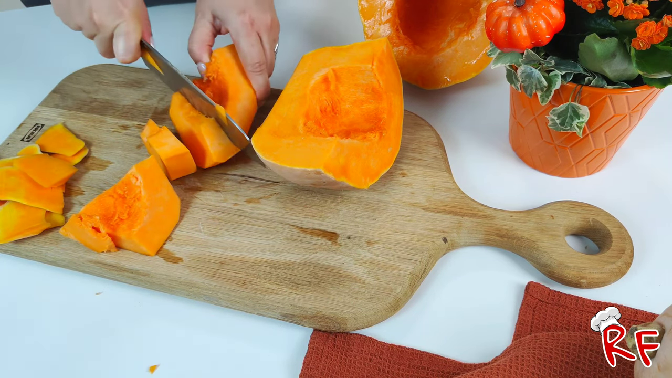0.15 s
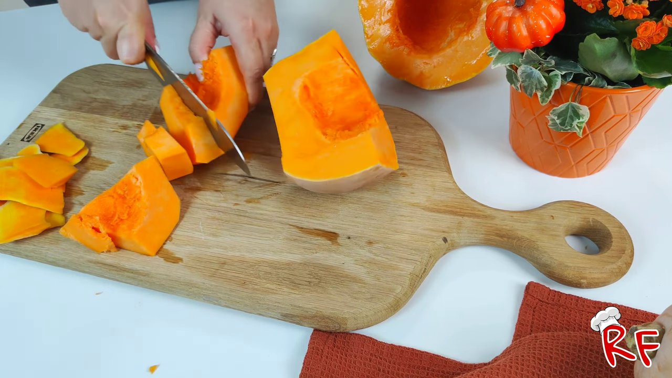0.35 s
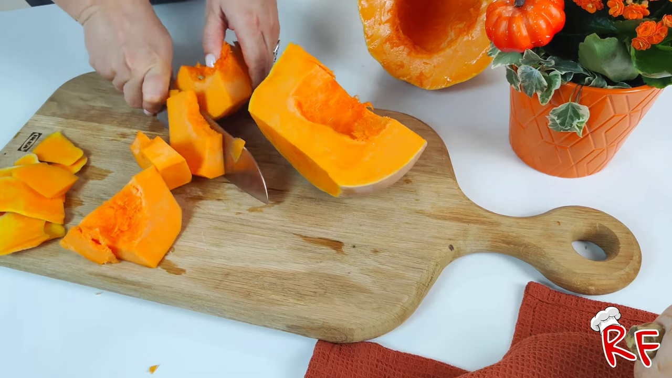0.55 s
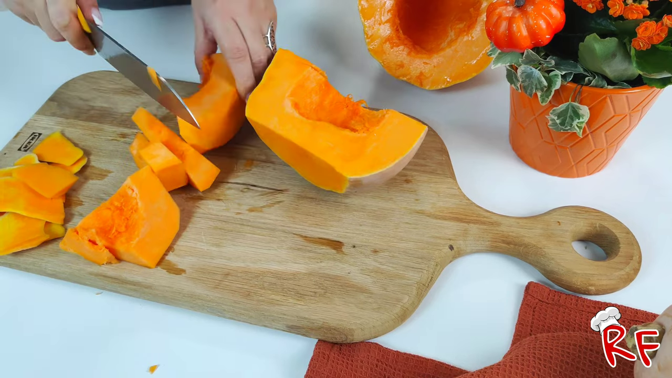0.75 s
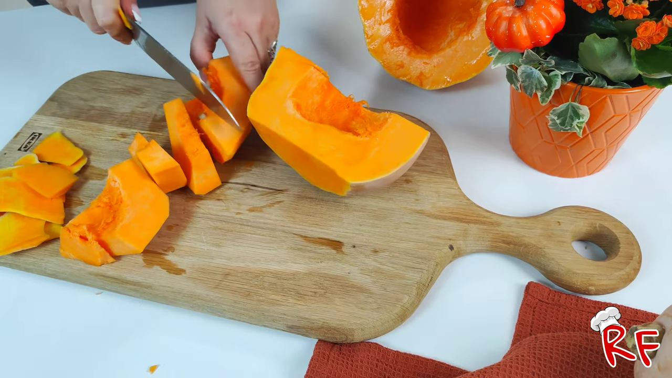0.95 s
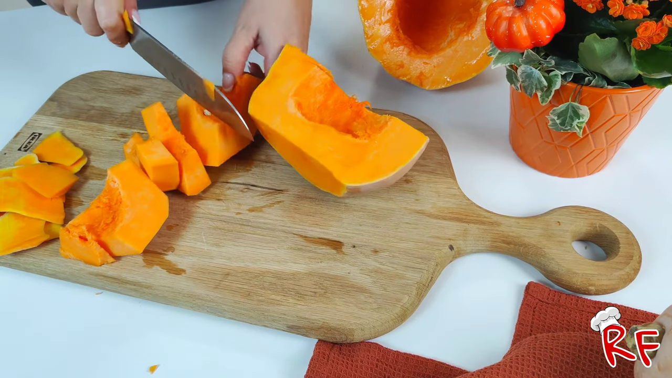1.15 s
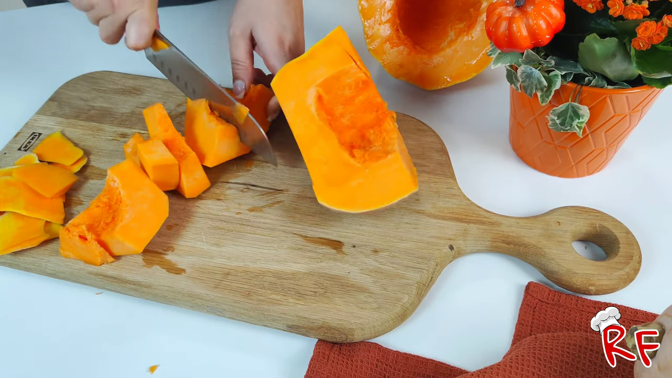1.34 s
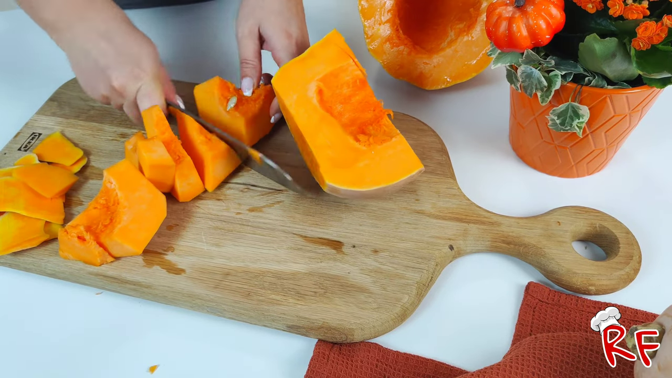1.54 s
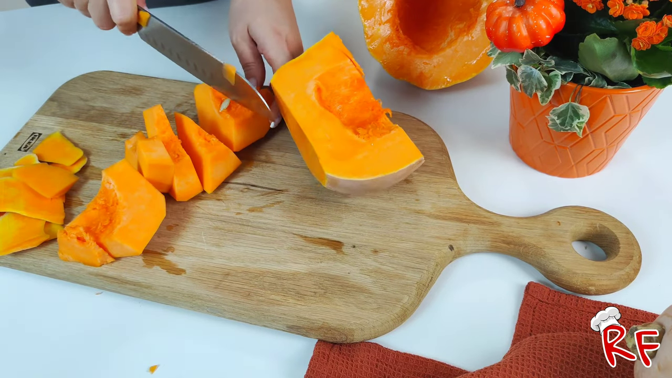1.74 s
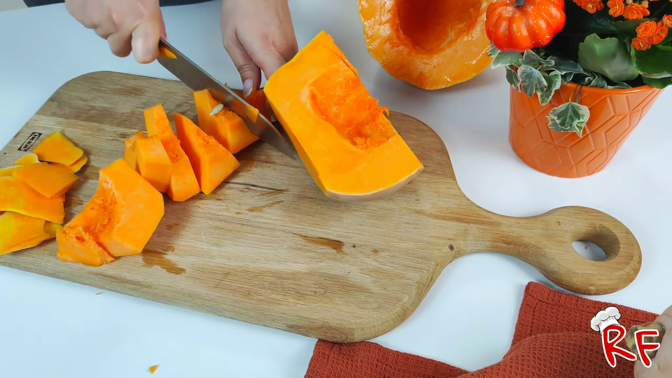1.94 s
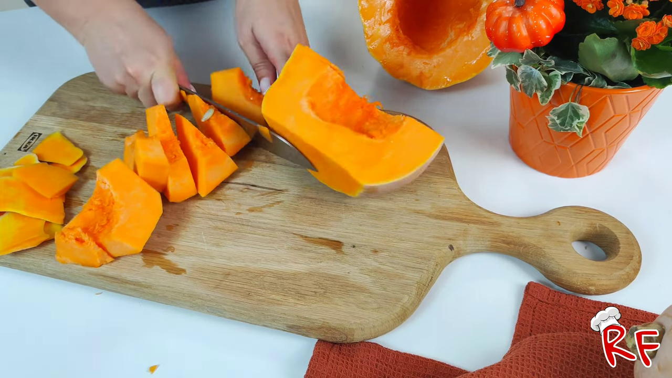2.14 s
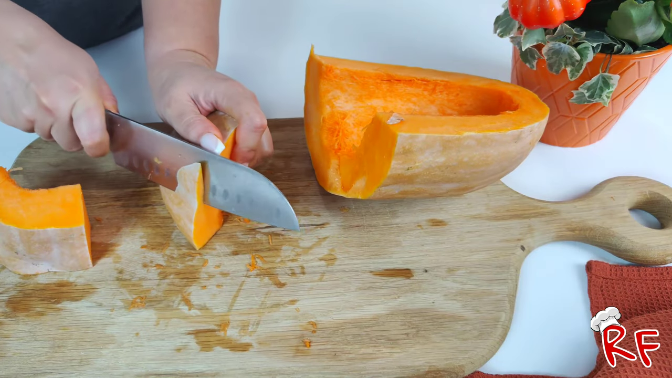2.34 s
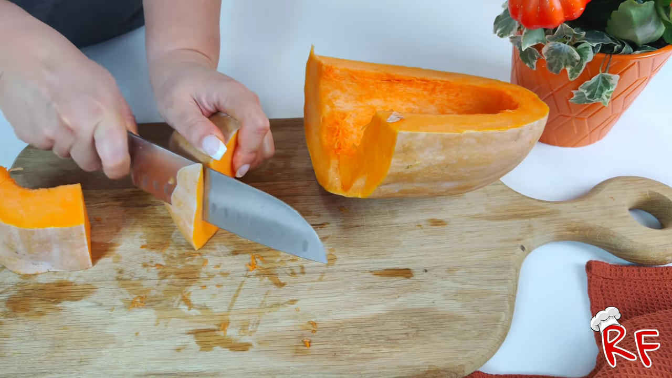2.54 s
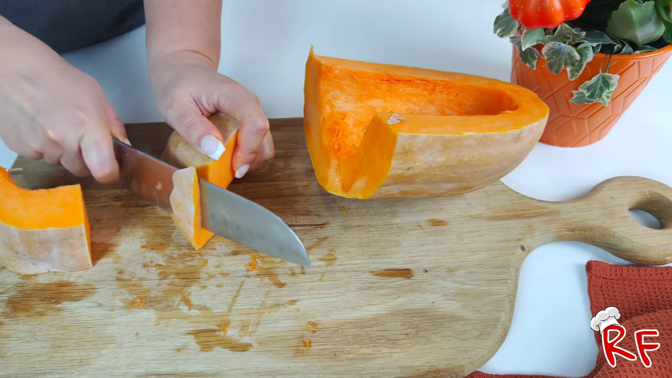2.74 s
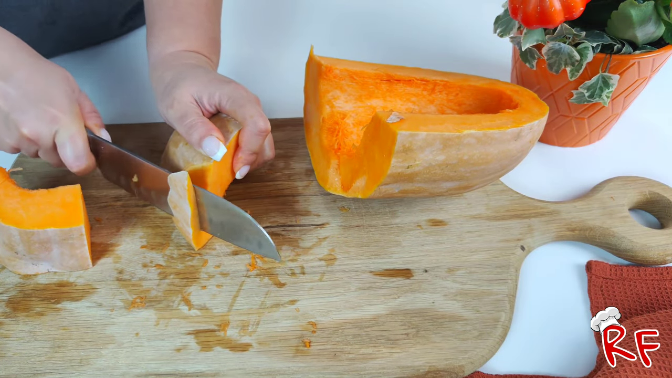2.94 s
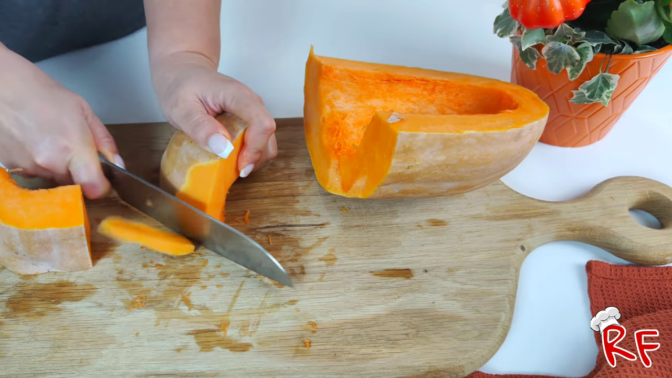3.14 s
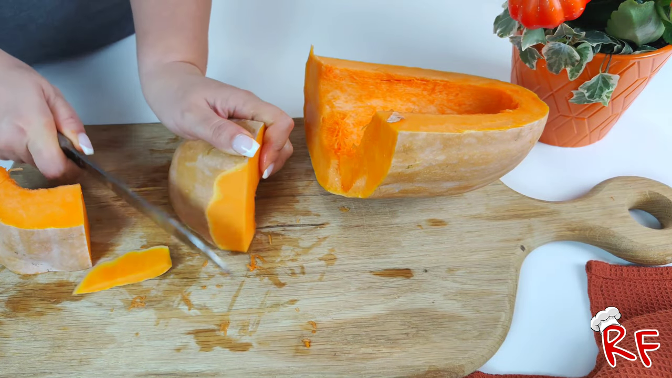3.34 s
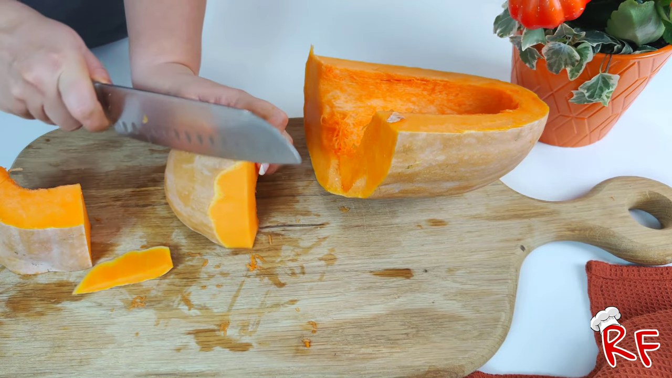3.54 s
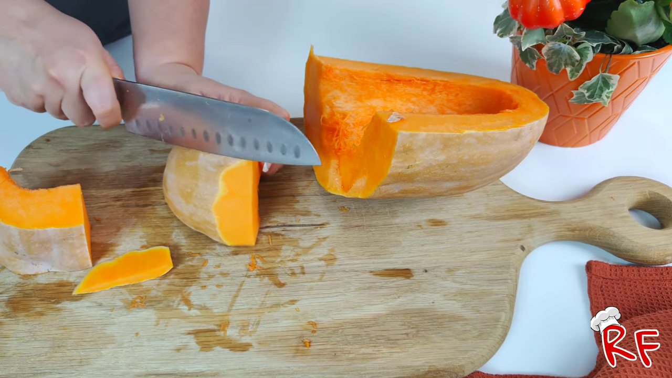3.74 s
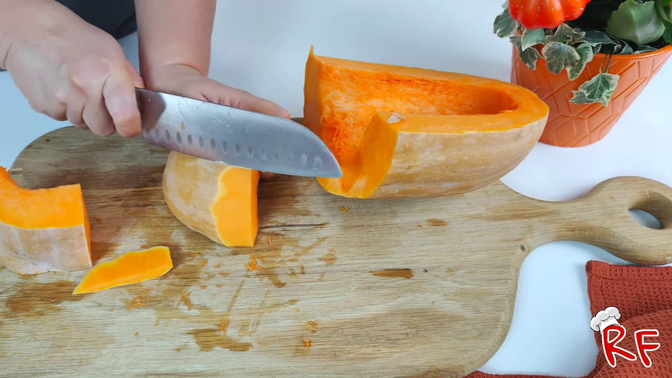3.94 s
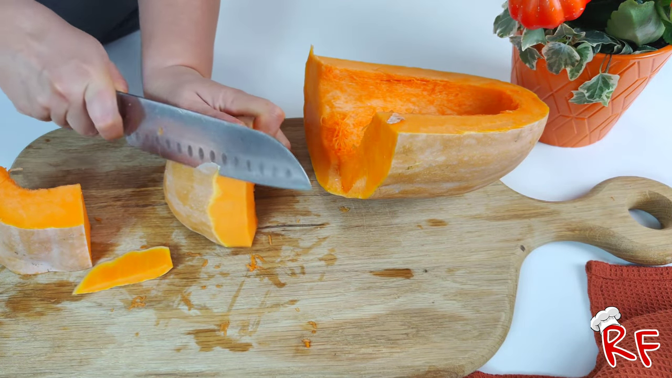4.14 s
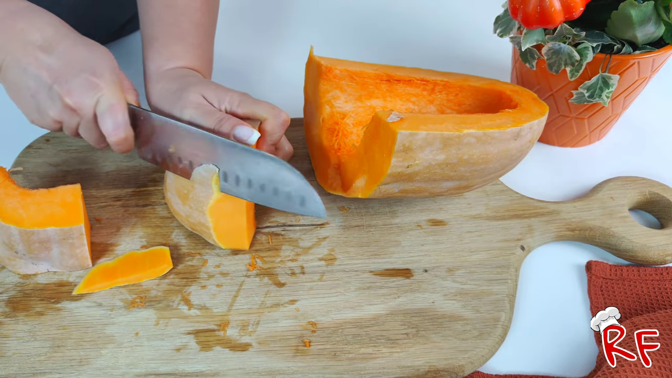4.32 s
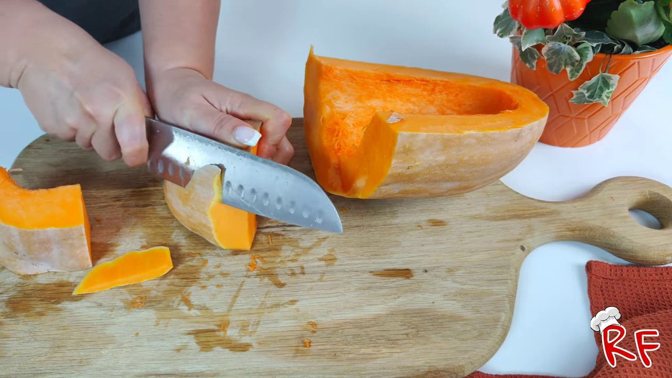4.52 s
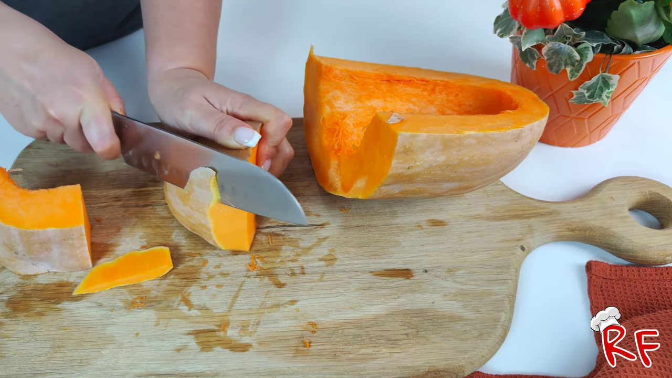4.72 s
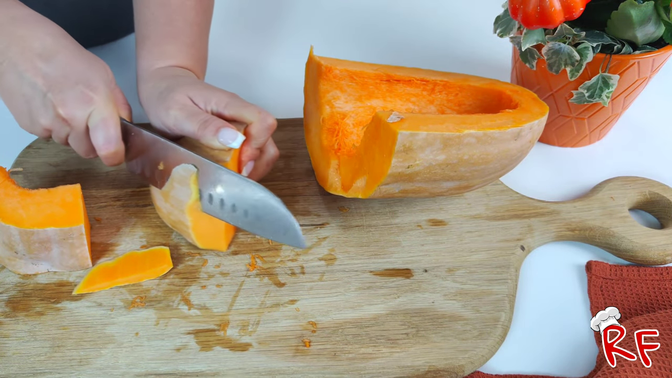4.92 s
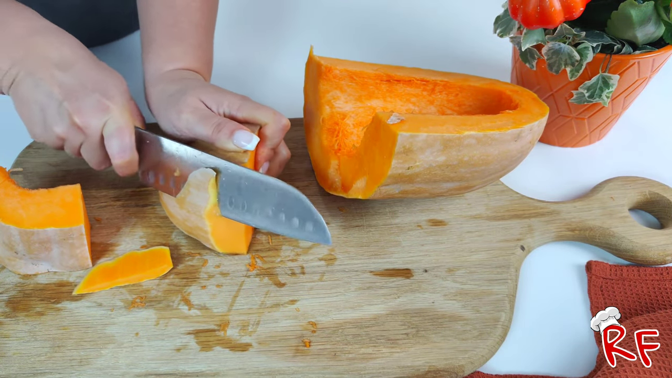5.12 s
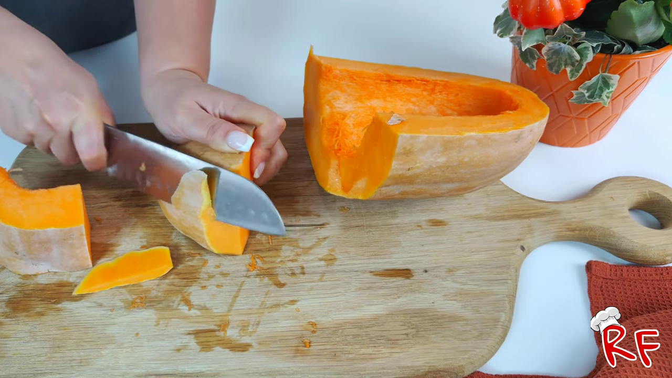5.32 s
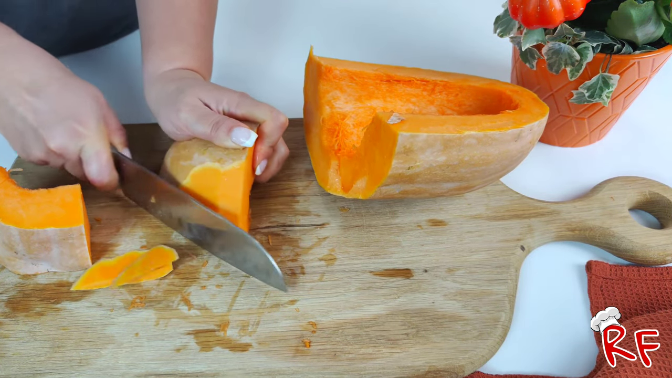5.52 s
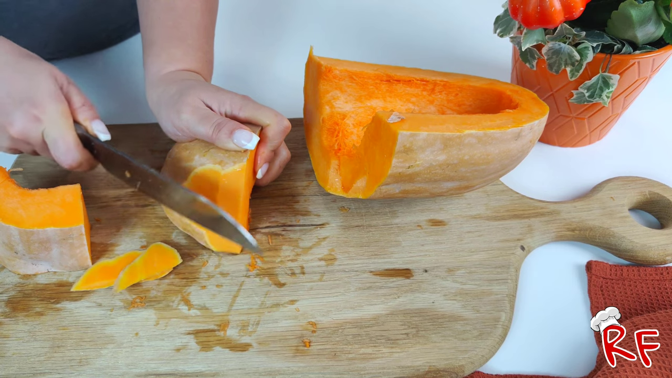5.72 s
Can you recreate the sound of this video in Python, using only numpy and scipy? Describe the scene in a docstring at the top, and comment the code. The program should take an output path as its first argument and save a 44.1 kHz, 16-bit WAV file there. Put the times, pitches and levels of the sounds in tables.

```python
"""A raw pumpkin is cut on a wooden board in a ringing kitchen, first with a slim knife, then with a broad one.
The blade hisses, rubs and fizzes through the flesh in short strokes: dense random clicks, coloured and swelled.
Chops, rind snaps, flesh cracks, bumping pieces and a toppling slice are crunchy pushes that ring resonances
and then the room. Squeaks are gliding narrow bands of noise; shaped noise makes the rumble of the working
hands and the quiet of the room."""
import sys
import numpy as np
from scipy import signal
from scipy.fft import rfft, irfft, next_fast_len
from scipy.io import wavfile

SR = 44100
rng = np.random.default_rng(int(sys.argv[2]) if len(sys.argv) > 2 else 0)


def unload_audio(sound):
    """Save the sound as a 16-bit wav file, at the path given as the first command line argument."""
    columns = np.transpose(np.atleast_2d(sound))
    # keep every value between -1 and 1, then stretch to whole-number steps
    steps = np.round(np.clip(columns, -1, 1) * 32767)
    wavfile.write(sys.argv[1], SR, steps.astype(np.int16))


N = 254438

# How a broad-knife movement begins and ends: attack [s], release [s], lingering level [dB], its 60 dB fade time [s]
BROAD_MOTION = (0.07, 0.0249, -8.5, 0.59)
LEFT_RIGHT_HALVES = np.array([[.5], [-.5]])  # shares a left-right difference in dB between the channels


def gain_of(db):
    """Decibels to amplitude."""
    return 10 ** (np.asarray(db) / 20)


def unit(x):
    """Scales a sound to an energy of one per channel, averaged over the channels."""
    return x / np.sqrt(np.sum(x ** 2) / len(x) + 1e-20)


def read(points, hz):
    """Reads a spectrum on a log-frequency axis."""
    f, value = np.transpose(points)
    return np.interp(np.log(hz + 1), np.log(f + 1), value)


def add(mix, s, sound):
    """Mixes a sound in at time s, cutting it off at the end of the mix."""
    part = mix[:, round(s * SR):][:, :sound.shape[1]]
    part += sound[:, :part.shape[1]]


def diffuse(x):
    """Makes two unrelated noises alike in the bass, as a room does at two close microphones."""
    # Likeness of left and right: f/Hz, correlation [0 to 1]
    likeness = [(100, .93), (350, .87), (600, .55), (1100, .25), (2200, .05), (15000, 0)]
    a, b = rfft(x)
    hz = np.fft.rfftfreq(x.shape[1], 1 / SR)
    turn = np.arccos(np.clip(read(likeness, hz), -1, 1)) / 2
    left = a * np.cos(turn) + b * np.sin(turn)
    right = a * np.cos(turn) - b * np.sin(turn)
    return irfft([left, right], x.shape[1])


def coloured(x, spectrum, side=((1000, 0),)):
    """Gives a stereo noise a spectrum and a left-right balance, at rms one."""
    hz = np.fft.rfftfreq(N, 1 / SR)
    db = read(spectrum, hz) + LEFT_RIGHT_HALVES * read(side, hz)
    return unit(irfft(rfft(diffuse(x)) * gain_of(db), N)) * np.sqrt(N)


def strokes(rows, motion):
    """Gain of hand movements (s, length s, dB, swell dB): each gathers speed, swells, stops and lingers."""
    attack_s, release_s, linger_db, linger_s = motion
    out = np.zeros((1, N))
    for s, length, db, swell_db in rows:
        t = np.arange(0, length + linger_s, 1 / SR)
        after = np.maximum(t - length, 0)
        attack = np.sin(np.pi / 2 * np.minimum(t / attack_s, 1)) ** 2
        hold = gain_of(db + swell_db * (np.minimum(t / length, 1) - .5))
        linger = gain_of(linger_db - 60 * after / linger_s)
        release = np.maximum(np.exp(-after / release_s), linger)
        add(out, s, (attack * hold * release)[None])
    return out


def uneven(depth_db, per_s):
    """A gain that wanders at random, with per_s new targets a second."""
    steps = rng.standard_normal(4096)
    return gain_of(depth_db * np.interp(np.arange(N) / SR * per_s, np.arange(len(steps)), steps))


def catching():
    """The blade catches in the fibres, so its speed, and with it the level, is uneven."""
    return uneven(depth_db=0.5, per_s=74)


def tearing(per_s, spread_db, wash):
    """Cell walls burst under the edge: random clicks of uneven size over their own wash in the room."""
    sizes = gain_of(spread_db * np.minimum(rng.exponential(1, N), 4)) * rng.standard_normal((2, N))
    clicks = sizes * (rng.random(N) < per_s / SR)
    return unit(clicks) + wash * unit(rng.standard_normal((2, N)))


def nearby(x, echo_db, count=8):
    """Board, hands and pumpkin throw back early echoes that comb the treble, differently at each microphone."""
    taps = np.zeros((2, SR // 200))
    delays = rng.integers(SR // 2000, SR // 200, (2, count))  # 0.5 to 5 ms
    np.put_along_axis(taps, delays, rng.choice([-1., 1.], (2, count)), 1)
    echoes = signal.sosfilt(signal.butter(2, 1500, "high", fs=SR, output="sos"), unit(taps))
    return x + gain_of(echo_db) * signal.oaconvolve(x, echoes, axes=1)[:, :N]


def ring(modes, treble_db, bass_db, pitch=1, size=8192):
    """Causal response of damped resonances; a harder contact lifts the treble, a heavier one the bass."""
    hz = abs(np.fft.fftfreq(size, 1 / SR))
    power = sum((gain_of(db) / (1 + ((hz - f * pitch) / (width / 2)) ** 2)) ** 2 for f, width, db in modes)
    treble_shelf = treble_db * hz ** 2 / (hz ** 2 + 2800 ** 2)
    bass_shelf = bass_db / (1 + (hz / 850) ** 6)
    radiated = (hz / np.hypot(hz, 0.5 * modes[0][0])) ** 2  # little is radiated below the lowest resonance
    log_gain = np.log(np.sqrt(power) * gain_of(treble_shelf + bass_shelf) * radiated + 1e-5)
    minimum_phase = np.exp(np.conj(signal.hilbert(log_gain)))
    return np.fft.ifft(minimum_phase).real[None, :size // 2]


def kitchen(fade_s, build_s, bend, wall_db):
    """A wall echo in a diffuse tail with standing waves: it builds up, then fades by band; bend > 1 speeds it up."""
    # Standing waves of the kitchen: f/Hz, level/dB
    standing = [(341, -20.5), (511, -27), (600, -20.5), (879, -26.5), (977, -35), (1025, -27),
                (1073, -26.5), (1104, -24.5), (1233, -30.5), (1593, -28), (1720, -31), (1943, -25.5),
                (2015, -28.5), (2547, -27.5)]
    # How each band fades: f/Hz, factor on the fade time
    band_fade = [(100, 0.24), (500, 0.83), (1200, 0.94), (2200, 0.99), (5000, 1.08), (9000, 0.97),
                 (15000, 1.3)]
    t = np.arange(next_fast_len(round(fade_s * SR))) / SR
    waves = np.zeros((2, len(t)))
    for f, db in standing:
        phase = 2 * np.pi * (f * t + rng.random()) + rng.normal(0, 0.68, (2, 1))
        waves += gain_of(db) * np.cos(phase)
    noise = diffuse(rng.standard_normal((2, len(t))))
    hz, age, z = signal.stft(noise + waves, SR, nperseg=256)
    fall_db = -60 * (age / (fade_s * read(band_fade, hz)[:, None])) ** bend
    tail = signal.istft(z * gain_of(fall_db), SR, nperseg=256)[1][:, :len(t)]
    tail = unit(tail * (1 - np.exp(-t / build_s)))
    tail[:, round(.0228 * SR)] += gain_of(wall_db)
    return signal.sosfilt(signal.butter(2, 90, "high", fs=SR, output="sos"), tail)


def blows(rows, modes, build_s, bend, wall_db, room_treble_db, room_side_db):
    """Each blow is one sharp push inside a crunch of breaking cells; it rings the struck thing and then the room."""
    out, lead = np.zeros((2, N)), SR // 50
    t = np.arange(-lead, 3 * lead) / SR
    for s, db, treble_db, bass_db, crunch_s, room_db, fade_s, pitch in rows:
        cells = rng.standard_normal((2, len(t))) * np.exp(-np.maximum(t, -1.8 * t) / crunch_s)
        push = np.array([t == 0, np.roll(t == 0, 2)])  # the left microphone is a little nearer
        force = push + crunch_s / 0.0013 * unit(diffuse(cells))  # the longer the crunch, the less of a single click
        direct = signal.fftconvolve(force, ring(modes, treble_db, bass_db, pitch), axes=1)
        room_ring = ring(modes, treble_db + room_treble_db, bass_db, pitch)
        tail = signal.fftconvolve(kitchen(fade_s, build_s, bend, wall_db), room_ring, axes=1)
        add(out, s - lead / SR, gain_of(db) * unit(direct))
        add(out, s, gain_of(db + room_db + room_side_db * LEFT_RIGHT_HALVES) * unit(tail))
    return out


def small_blows(rows, room_db, fade_s):
    """Small blows of one kind share their pitch and the level and fade time of the tail."""
    return [(*row, room_db, fade_s, 1) for row in rows]


def handling():
    """The board rumbles unevenly under the hands, over the quiet of the room: two shaped noises."""
    # Colour of the quiet room: f/Hz, relative level per Hz/dB
    still_colour = [(41, -46.5), (70, -18), (241, 3), (330, -4.5), (1450, -10), (1590, -15), (4460, -14),
                    (10000, -25), (11700, -21.5), (15000, -37)]
    # Colour of the rumbling board: f/Hz, relative level per Hz/dB
    rumble_colour = [(25, -6), (60, -6), (125, 5), (200, -4.5), (330, -5), (520, -3), (750, -13),
                     (1200, -17.5), (2500, -18), (6000, -22.5), (15000, -49)]
    # The hands hold the pumpkin down for the broad knife: t/s, length/s, rumble level/dB
    holding = (2.27, 4, -67.5)
    # They lean in to start a cut or to force it through: t/s, length/s, rumble level/dB
    leans = [(2.339, 0.34, -62.5), (3.19, 0.24, -64.5), (5.442, 0.12, -51.5)]
    still = gain_of(-72) * coloured(rng.standard_normal((2, N)), still_colour)
    held = strokes([(*holding, 0)], BROAD_MOTION)
    leaning = strokes([(*lean, 0) for lean in leans], BROAD_MOTION)
    rumble = coloured(rng.standard_normal((2, N)), rumble_colour, [(100, -2), (400, 0)])
    return still + rumble * np.hypot(held, leaning) * uneven(depth_db=3.5, per_s=45)


def rind_snaps():
    """The rind snaps: small crunches ring its broad, heavily damped resonances."""
    # Snaps: t/s, energy/dB, treble/dB, bass/dB, crunch length/s
    snaps = [(.09, -44.5, -4, 3, .003), (.135, -41, -9, 4.5, .005), (.178, -36, -1.5, 20.5, 0.0076),
             (.222, -39.5, 3.5, 3.5, .003), (.241, -30.5, -7.5, 14.5, 0.015),
             (.376, -25.5, -23.5, 4, 0.0021), (.404, -16, 13, 6.5, 0.0072), (.508, -14, 3, -10.5, 0.0048),
             (1.892, -37, 1.5, 1, 0.0045), (3.768, -27.5, -5, 2, 0.0032), (5.541, -4.5, -39, 18, .006)]
    # Resonances of the rind: f/Hz, width/Hz, level/dB
    rind = [(397, 800, -11.5), (1050, 240, -5.5), (2690, 1500, 0), (3700, 900, -6.5), (5120, 1700, 0.5),
            (8200, 4900, -10), (12500, 5000, -17)]
    return blows(small_blows(snaps, room_db=-5.5, fade_s=0.59), rind,
                 build_s=0.0089, bend=0.67, wall_db=-21.0, room_treble_db=0.5, room_side_db=2.5)


def slim_slicing():
    """The slim blade hisses through the flesh as cell walls burst, close to board and hands."""
    # Strokes: t/s, length/s, hiss level/dB, swell over the stroke/dB
    pushes = [(.11, 0.085, -73, 7.5), (.215, 0.073, -61.5, -3), (.325, 0.081, -60.5, 4), (.5, 0.11, -55, 0),
              (1.015, 0.026, -69, 2.5), (1.31, .022, -68.5, 0), (1.392, 0.032, -61.5, -1.5),
              (1.455, 0.098, -57.5, 18), (1.805, 0.17, -77.5, 10), (1.965, 0.152, -59, 8.5),
              (2.12, 0.05, -47.5, -6)]
    # How a stroke begins and ends: attack [s], release [s], lingering level [dB], its 60 dB fade time [s]
    motion = (0.03, 0.03, -11, 0.58)
    # Colour of the hiss: f/Hz, relative level per Hz/dB
    hiss_colour = [(100, -22.5), (600, -3), (1000, -2), (1500, -5.5), (2800, -1.5), (5000, -1.5),
                   (7500, -4), (12000, -5), (15500, -16)]
    hiss = coloured(nearby(tearing(per_s=2500, spread_db=4.5, wash=0.78), echo_db=2.5), hiss_colour)
    return catching() * hiss * strokes(pushes, motion)


def squeaks():
    """Wet rind sticks and slips on the steel: uneven slips excite one narrow resonance that glides."""
    # Squeaks: t/s, length/s, level/dB, first f/Hz, last f/Hz
    glides = [(0.253, 0.14, -68, 1063, 1010), (0.396, 0.017, -49.5, 6000, 3700),
              (0.505, 0.0074, -39.5, 4810, 2370), (0.514, 0.083, -58, 4200, 3700),
              (1.978, 0.084, -66.5, 830, 844), (2.08, 0.028, -56.5, 860, 867),
              (2.6, 0.052, -52.5, 525, 510), (3.911, 0.12, -64.5, 1330, 1270),
              (4.166, 0.08, -66.5, 2670, 2880), (4.268, 0.051, -55.5, 3040, 2718),
              (4.61, 0.13, -57, 1260, 1214), (5.048, 0.035, -43.5, 360, 344), (5.082, 0.078, -54, 350, 322),
              (5.193, 0.061, -44, 477, 510)]
    out = np.zeros((2, N))
    for s, length, db, first_hz, last_hz in glides:
        size = round(length * SR)
        r = np.exp(-np.pi * .09 * first_hz / SR)  # a pole width of 0.09 of the first pitch
        slips = diffuse(rng.standard_normal((2, SR // 4))) + 1j * diffuse(rng.standard_normal((2, SR // 4)))
        waver = signal.lfilter([1], np.poly([r, r]), slips)[:, -size:]
        carrier = np.exp(2j * np.pi * np.cumsum(np.geomspace(first_hz, last_hz, size)) / SR)
        tone = (waver * carrier).real
        add(out, s, gain_of(db) * np.sqrt(size) * unit(tone * signal.windows.tukey(size, .5)))
    return out


def piece_bumps():
    """Loose pieces bump on the board: soft blows ring a low, dull body."""
    # Bumps: t/s, energy/dB, treble/dB
    bumps = [(.392, -32.5, -10.5), (0.599, -25, 0), (0.984, -33.5, -16), (1.151, -35, -4),
             (1.242, -38.5, 0.5), (2.238, -22.5, -7), (3.777, -23, 16)]
    # Resonances of a loose piece: f/Hz, width/Hz, level/dB
    piece = [(232.4, 42, 6.5), (430.5, 250, -19), (990, 700, -16.5), (3440, 4000, -35.5)]
    rows = [(*bump, 0, 0.0041) for bump in bumps]  # level bass, 4.1 ms of crunch
    return blows(small_blows(rows, room_db=-9, fade_s=0.59), piece,
                 build_s=.01, bend=1.7, wall_db=-19, room_treble_db=-2.5, room_side_db=-1.5)


def slim_chops():
    """The slim blade's edge knocks on the board, and blade and board ring together."""
    # Chops: t/s, energy/dB, treble/dB, bass/dB, crunch length/s, tail level/dB,
    # fade time of the tail/s, factor on the resonances
    chops = [(.595, 3, 15.5, -10, 0.0054, 9, 0.45, 1.01), (1.5235, 3.5, -5, -5, 0.0016, -3.5, 0.32, 1.011),
             (2.111, 4, -4.5, -3, 0.0016, -3, 0.27, 0.98)]
    # Resonances of slim blade on board: f/Hz, width/Hz, level/dB
    slim_on_board = [(236, 24, -16.5), (500, 86, -11.5), (620, 300, -14), (790, 130, -24), (994, 167, 6),
                     (1317, 550, -2.5), (1810, 290, -0.5), (2190, 660, -4), (2830, 620, -9.5),
                     (4200, 830, -13.5), (4680, 1700, -9.5), (5600, 4100, -19.5), (10940, 3000, -30)]
    return blows(chops, slim_on_board,
                 build_s=0.003, bend=1.244, wall_db=-18.0, room_treble_db=-1.0, room_side_db=1.0)


def toppling_slice():
    """A cut slice topples flat onto the board: a short slap rings its two resonances."""
    # Topples: t/s, energy/dB, treble/dB, bass/dB, crunch length/s
    topples = [(1.668, -11, -9, 1, 0.001)]
    # Resonances of the slice: f/Hz, width/Hz, level/dB
    slice_modes = [(533, 195, -15.5), (1050, 200, 1)]
    return blows(small_blows(topples, room_db=-3, fade_s=0.22), slice_modes,
                 build_s=0.019, bend=1.0, wall_db=-20, room_treble_db=-7, room_side_db=0.5)


def broad_slicing():
    """The broad blade rubs on the slice, which resonates, and its wet face fizzes."""
    # Strokes of the broad blade, some hard, some light:
    # t/s, length/s, rub level/dB, fizz level/dB, swell over the stroke/dB
    cuts = [(2.281, 0.2, -60.5, -63.5, 4), (2.539, 0.1, -47, -51, 2), (2.69, .085, -71, -66.5, -6),
            (2.84, 0.087, -50.5, -55, 2), (3.111, 0.081, -41.5, -44, 9), (3.915, 0.096, -59.5, -68.5, 7.5),
            (4.113, 0.0914, -64, -65.5, 5.5), (4.25, 0.13, -47, -52.5, 5.5), (4.586, .088, -50, -55, 6),
            (4.735, 0.1, -69, -69, -9), (4.877, .095, -44.5, -50.5, -5.5), (5.04, 0.061, -53, -69.5, -3),
            (5.16, 0.11, -52, -64, -1), (5.315, 0.12, -56.5, -57.5, -1.5),
            (5.464, 0.085, -38.5, -40.5, 16.5)]
    # The wet blade is drawn out past the slice after a cut: t/s, length/s, fizz level at first/dB
    draws = [(3.19, 0.279, -43), (5.558, 0.14, -42)]
    # Resonances of the rubbed slice: f/Hz, width/Hz, level/dB
    rub_modes = [(510, 82, 5.5), (630, 180, -12.5), (995, 180, 0.5), (1200, 320, -5.5), (1440, 790, 0),
                 (1920, 400, -6.5), (2290, 560, -0.5), (2760, 610, -7), (3650, 1300, -12.5),
                 (4580, 760, -13), (5670, 780, -10)]
    # Colour of the fizz: f/Hz, relative level per Hz/dB
    fizz_colour = [(2000, -18), (6000, -19.5), (7000, -7.5), (9800, -7.5), (12500, -6.5), (15000, -5.5),
                   (16000, -7.5)]
    # Balance of rub and fizz: f/Hz, left minus right/dB
    side = [(200, 3), (700, -0.5), (1300, 2.5), (2400, -3), (4400, 7), (8100, -12), (15000, -17.5)]
    slowing = -71  # dB per s, as a draw slows down
    slips = nearby(tearing(per_s=2000, spread_db=2, wash=1.2), echo_db=3.0)
    grain = signal.oaconvolve(slips, ring(rub_modes, 0, 0), axes=1)[:, :N]
    rub = coloured(grain, [(1000, 0)], side)
    fizz = coloured(nearby(tearing(per_s=2600, spread_db=-0.5, wash=0.84), echo_db=8), fizz_colour, side)
    rubbing = strokes([(s, length, db, swell) for s, length, db, _, swell in cuts], BROAD_MOTION)
    fizzing = strokes([(s, length, db, swell) for s, length, _, db, swell in cuts], BROAD_MOTION)
    # A stroke's level holds at its middle, so half the slowing is added to the first level
    draw_rows = [(s, length, db + slowing * length / 2, slowing * length) for s, length, db in draws]
    drawing = strokes(draw_rows, BROAD_MOTION)
    return catching() * rub * rubbing + fizz * (fizzing + drawing)


def flesh_cracks():
    """The flesh cracks ahead of the blade: crunching blows ring its mid-range resonances."""
    # Cracks: t/s, energy/dB, treble/dB, bass/dB, crunch length/s
    cracks = [(2.418, -35, 14.5, 8, 0.0098), (2.715, -19.5, -14, 12, .003), (3.373, -2, 21, -6, 0.0032),
              (4.086, -22, -18, -5, 0.0031), (4.45, -26.5, 14, 7, .004), (5.048, -13.5, 2, -2.5, 0.0076),
              (5.129, -23, -3, 21, 0.0024), (5.178, -2.5, -9, -2.5, 0.0036),
              (5.1845, 3.5, -7.5, -6.5, 0.004), (5.264, -1, -7, -11, 0.0032), (5.271, -2, -7, 2.5, .002),
              (5.337, -4.5, -18, 5.5, 0.0025)]
    # Resonances of the flesh: f/Hz, width/Hz, level/dB
    flesh = [(392, 75, 4.5), (513, 114, -1), (1189, 360, 1.5), (1540, 340, -6.5), (1894, 197, -6),
             (2250, 340, -5), (2880, 910, -16), (4160, 2740, -27), (11200, 8500, -68)]
    return blows(small_blows(cracks, room_db=-4.5, fade_s=.47), flesh,
                 build_s=0.0164, bend=1.2, wall_db=-16.0, room_treble_db=2.5, room_side_db=1.5)


def broad_chops():
    """The broad blade's edge knocks on the board, and blade and board ring together."""
    # Chops: t/s, energy/dB, treble/dB, bass/dB, crunch length/s, tail level/dB,
    # fade time of the tail/s, factor on the resonances
    chops = [(3.191, 11.85, -11, -1.1, 0.0015, 7.56, 0.87, 1.006),
             (5.5522, 16.28, 1, -1.1, 0.0037, 5.76, .87, 1.001)]
    # Resonances of broad blade on board: f/Hz, width/Hz, level/dB
    broad_on_board = [(120, 81, -13), (220, 390, -20.5), (374, 37, -20.5), (522, 91, 3.5), (570, 22, -0.5),
                      (723, 110, -6.5), (924, 100, -0.5), (1040, 530, -0.5), (1276, 180, -3.5),
                      (1530, 850, -1), (2033, 120, -2), (2580, 110, -7), (3030, 1600, -14.5),
                      (4300, 990, -22.5), (5880, 630, -21), (9700, 12000, -39), (14500, 5500, -47)]
    return blows(chops, broad_on_board,
                 build_s=0.023, bend=1.0, wall_db=-17.5, room_treble_db=1.5, room_side_db=1.4)


def scene():
    """Slim and broad knife work with its blows and squeaks, over the handled board and the quiet room."""
    slim_knife = slim_slicing() + slim_chops()
    broad_knife = broad_slicing() + broad_chops()
    pumpkin = rind_snaps() + piece_bumps() + toppling_slice() + flesh_cracks()
    return slim_knife + broad_knife + pumpkin + squeaks() + handling()


def record(dry):
    """The hardest knocks are rounded off towards 0.92 of full scale; then the band ends near 15.8 kHz."""
    rounded = dry / (1 + (dry / .92) ** 6) ** (1 / 6)
    lowpass = signal.firwin(255, 15800, window=("kaiser", 8), fs=SR)
    return signal.oaconvolve(rounded, lowpass[None], "same", axes=1)


dry = scene()
out = record(dry)
unload_audio(out)
```